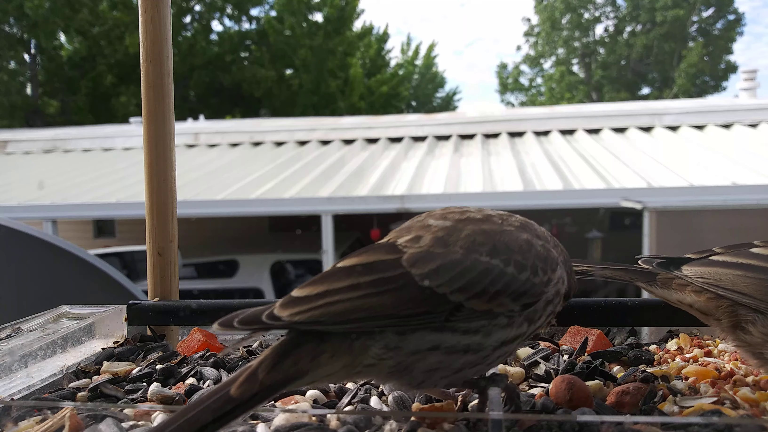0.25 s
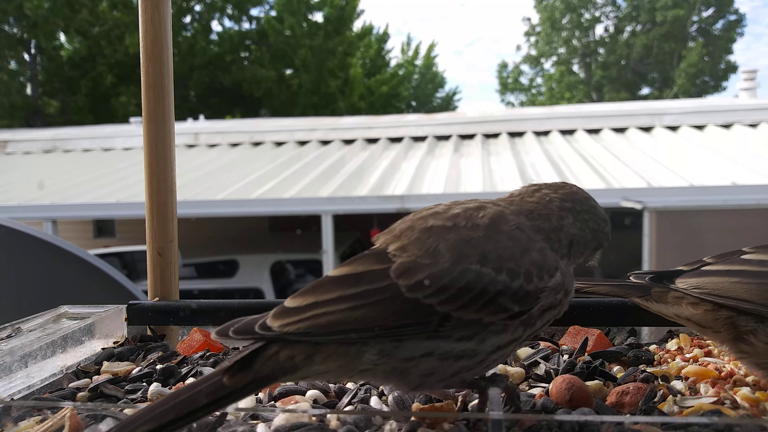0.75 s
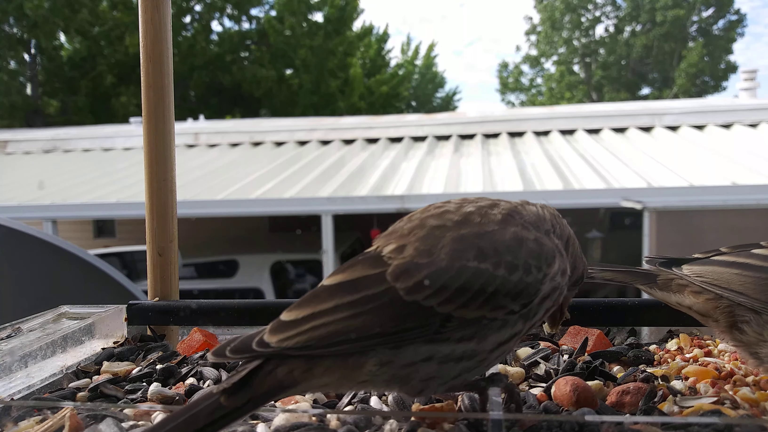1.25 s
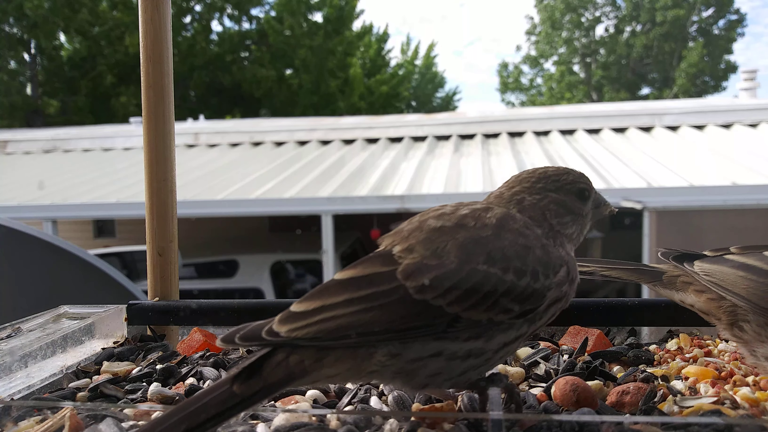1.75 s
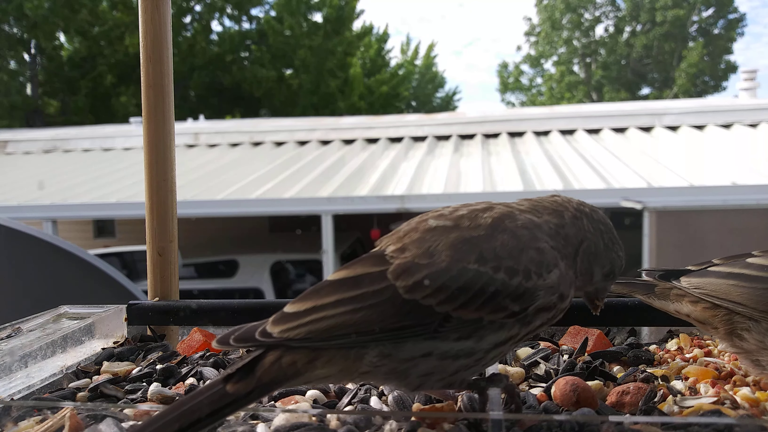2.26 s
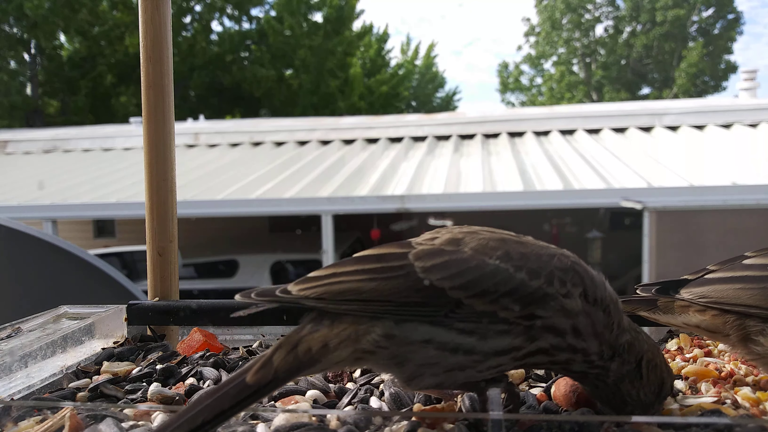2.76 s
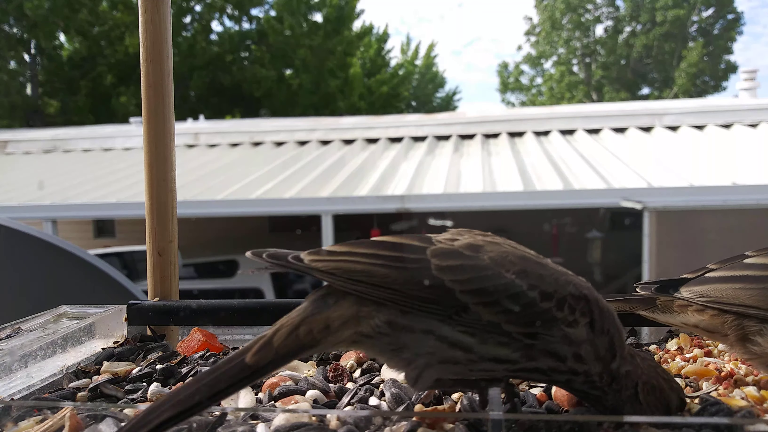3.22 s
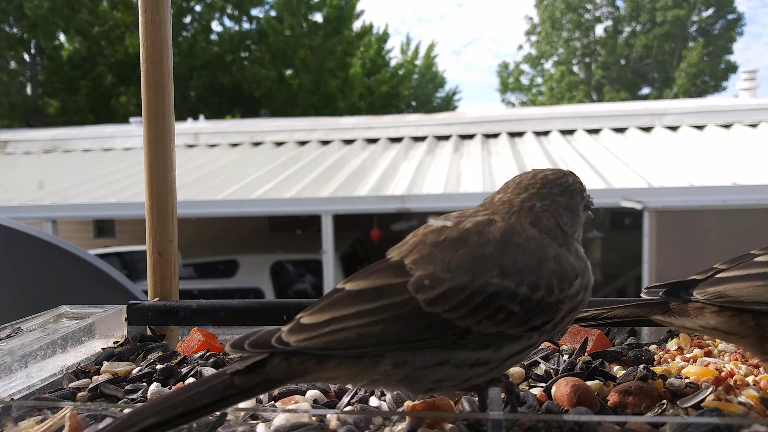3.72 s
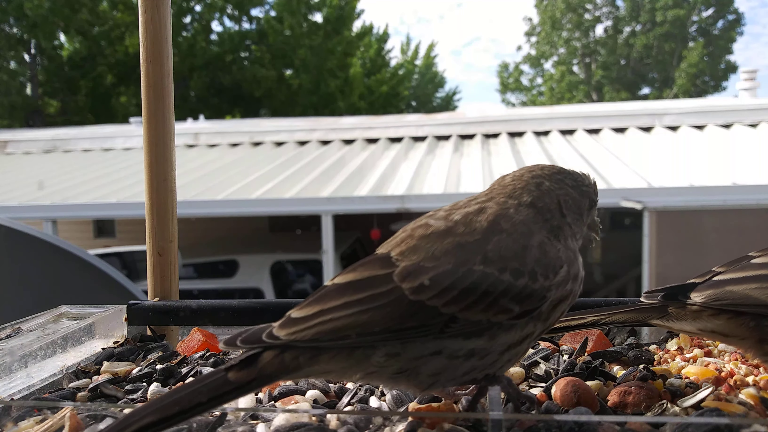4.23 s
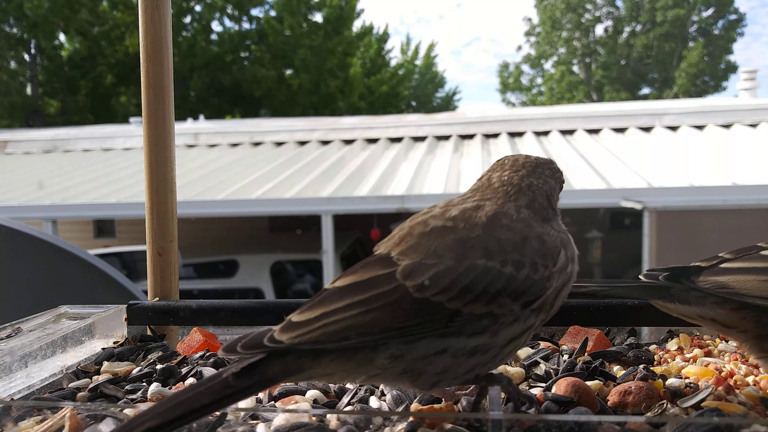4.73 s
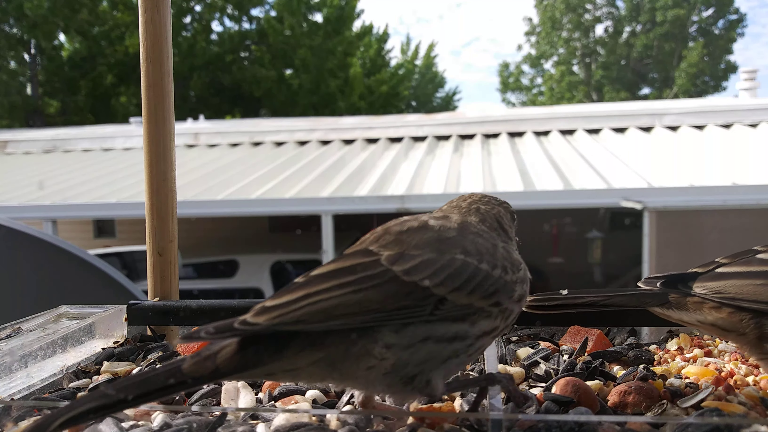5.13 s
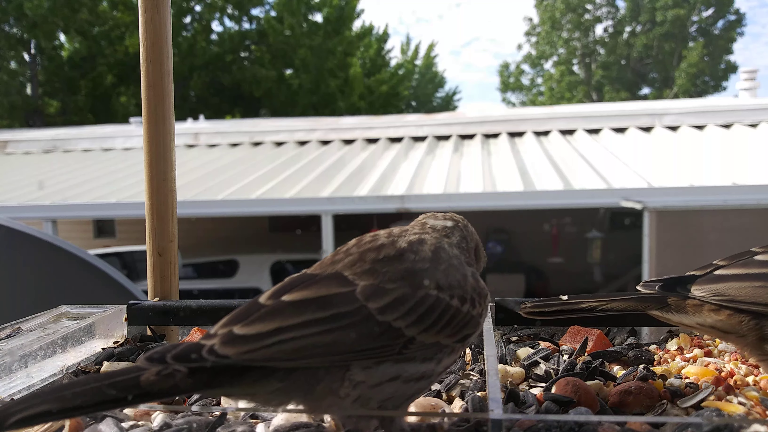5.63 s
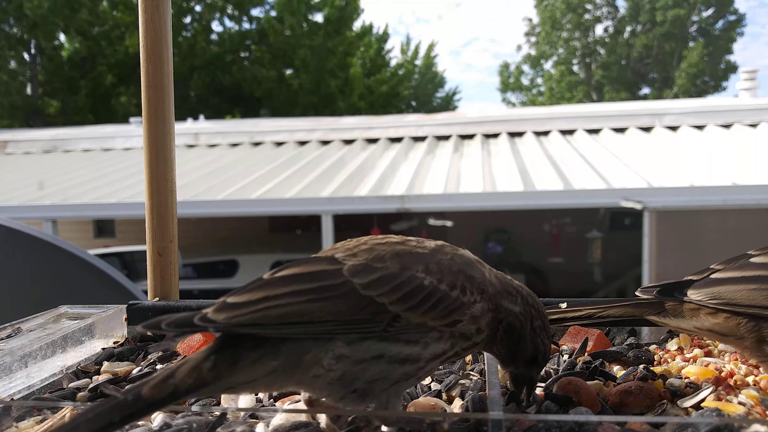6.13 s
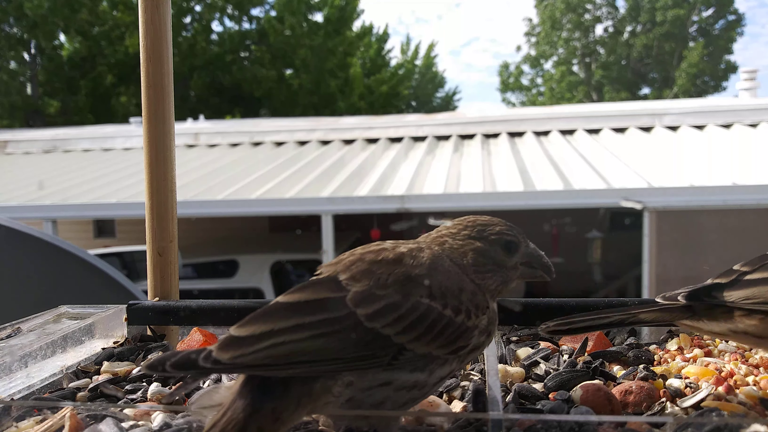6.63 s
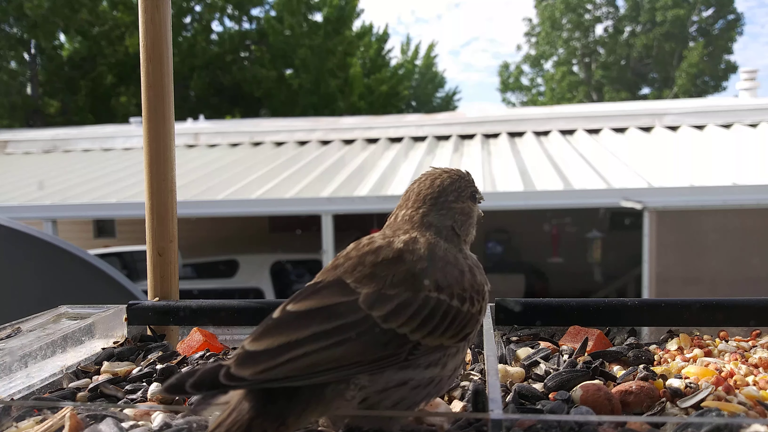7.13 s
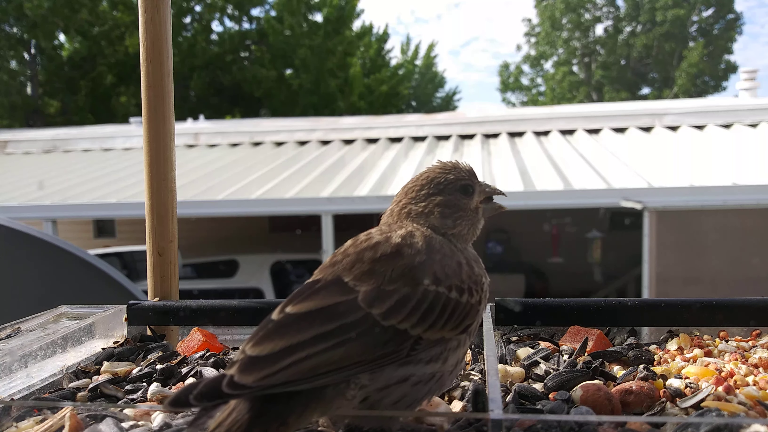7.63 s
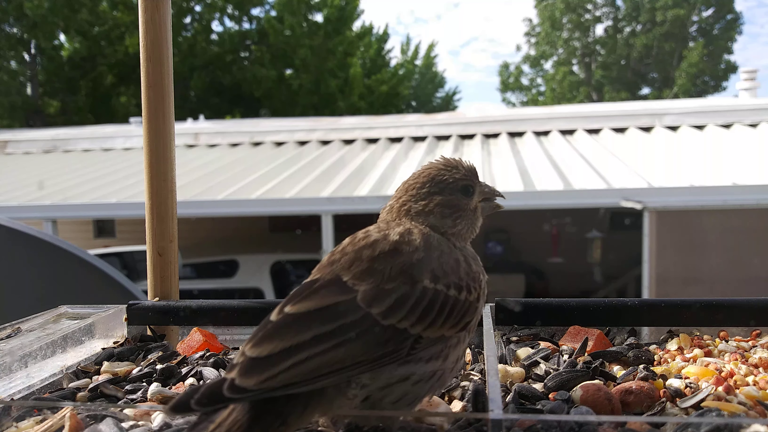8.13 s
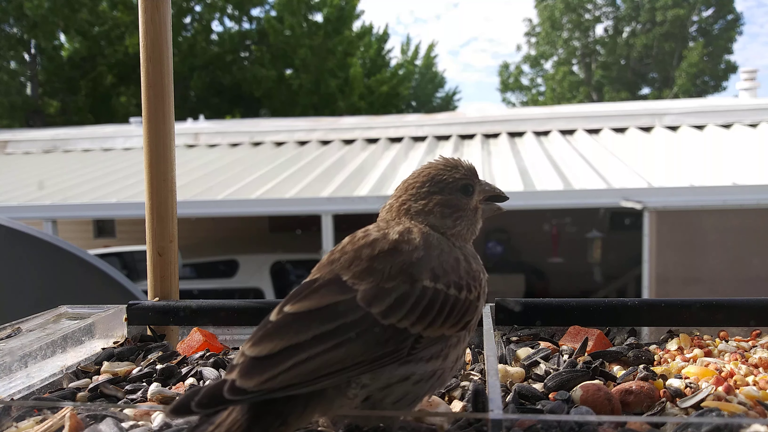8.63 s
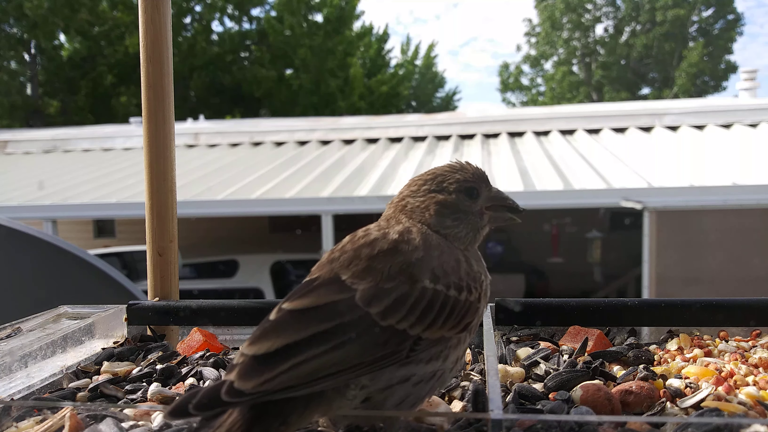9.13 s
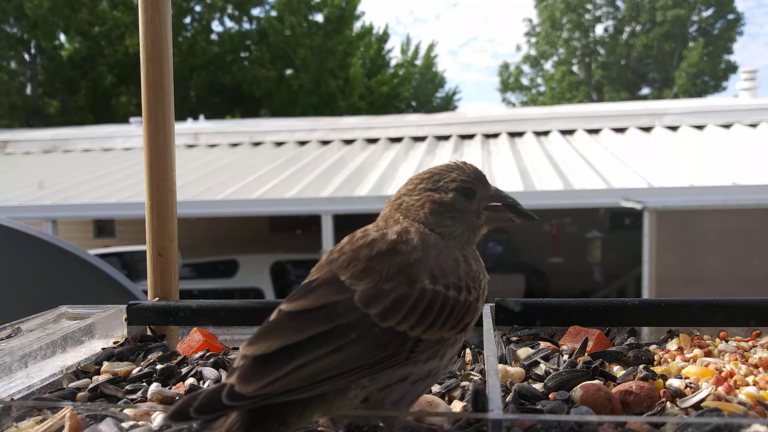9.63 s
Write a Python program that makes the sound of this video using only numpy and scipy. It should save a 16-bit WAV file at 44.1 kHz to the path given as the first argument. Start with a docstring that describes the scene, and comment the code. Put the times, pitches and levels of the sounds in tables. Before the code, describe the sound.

Dry, crisp beak clicks and brief raking of loose seed on a small hollow plastic tray, recorded centimetres away in an open yard. Activity is irregular: light at first, dense around three seconds, loudest just before seven, then delicate ticking. Breeze hums and low puffs of air bump the microphone, strongest late, over soft hush, distant whistles and blurred twittering.

```python
"""Beaks crack husks and rake seed, and dropped seeds knock on a plastic tray, centimetres from the microphone.
Two finches feed there: noise bursts drive tray modes and husk resonances; finer grains make the nibbling.
A breeze hums around the feeder (narrow noise and wavering tones) and puffs thump the microphone (low noise).
Other birds call far off in the yard (gliding sines, blurred chirps) over a steady hush (coloured noise)."""
import sys
import numpy as np
from scipy import signal
from scipy.fft import rfft, irfft, next_fast_len
from scipy.io import wavfile
from scipy.ndimage import uniform_filter1d, map_coordinates

SR = 44100
rng = np.random.default_rng(int(sys.argv[2]) if len(sys.argv) > 2 else 0)


def waveform_to_disk(signal):
    """Save audio, clipped to [-1, 1], as 16-bit WAV at the path in sys.argv[1]."""
    frames = np.transpose(np.atleast_2d(signal))
    scaled = np.clip(frames, -1, 1) * 32767
    samples = np.round(scaled).astype(np.int16)
    wavfile.write(sys.argv[1], SR, samples)


N = 435266
BAND_LIMIT_HZ = 15900


def amp(db):
    """Decibels to gain."""
    return 10 ** (np.asarray(db) / 20)


def unit(x):
    """Scales to rms 1."""
    return x / np.sqrt(np.mean(x ** 2) + 1e-20)


def spectrum_at(points, hz):
    """Reads (frequency [Hz], value) points on a log-frequency axis."""
    point_hz, value = np.transpose(points)
    return np.interp(np.log(hz + 1), np.log(point_hz), value)


def follow(rows):
    """Interpolates the columns of a curve table at every sample."""
    time_s, *columns = np.transpose(rows)
    return [np.interp(np.arange(N) / SR, time_s, column) for column in columns]


def add(mix, time_s, sound):
    """Mixes a sound in at a given time, cut at the end of the mix."""
    part = mix[max(round(time_s * SR), 0):][:len(sound)]
    part += sound[:len(part)]


def colour(x, points):
    """Shapes a long sound by (frequency [Hz], gain [dB]) points, at rms 1."""
    size = next_fast_len(N)
    gain = amp(spectrum_at(points, np.fft.rfftfreq(size, 1 / SR)))
    return unit(irfft(rfft(x, size) * gain, size)[:N])


def drift(knots_per_s):
    """Smooth random wandering, rms 1."""
    knots = rng.standard_normal(4000)
    return unit(map_coordinates(knots, [np.arange(N) / SR * knots_per_s], order=3, mode="wrap"))


def resonate(x, hz, q):
    """A resonance of peak gain 1; Q is at least 1."""
    return signal.lfilter(*signal.iirpeak(np.clip(hz, 100, SR / 3), max(q, 1), fs=SR), x)


def high_pass(x, hz):
    """Cuts steeply below hz."""
    return signal.sosfilt(signal.butter(4, hz, "highpass", fs=SR, output="sos"), x)


def narrow_noise(centre_hz, width_hz):
    """Slow complex noise shifted up to a pitch or pitch curve, rms 1."""
    turn = np.exp(2j * np.pi * np.cumsum(centre_hz * np.ones(N)) / SR)
    return unit(((drift(width_hz) + 1j * drift(width_hz)) * turn).real)


def mottle(x, depth_db, size=(9, 2)):
    """Patches of a few tens of milliseconds by about a hundred hertz swell and fade; rms 1."""
    z = signal.stft(x, nperseg=1024, noverlap=768)[2]
    patches = rng.standard_normal(z.shape)
    patches = uniform_filter1d(patches, size[0], axis=1)  # time
    patches = uniform_filter1d(patches, size[1], axis=0)  # frequency
    return unit(signal.istft(z * amp(depth_db * unit(patches)), nperseg=1024, noverlap=768)[1][:N])


def spells(rows, attack_s, release_db_per_s):
    """Gain of a layer in spells: each rises, holds for its length and dies away; the strongest wins."""
    t = np.arange(N) / SR
    gains = []
    for time_s, length_s, db in rows:
        rise = np.clip((t - time_s) / attack_s + .5, 0, 1)
        gains.append(rise * amp(db - release_db_per_s * np.maximum(t - time_s - length_s, 0)))
    return np.max(gains, axis=0)


def whistle(length_s, start_hz, end_hz, waver, flutter, wobbles_per_s):
    """One gliding sine that wavers in pitch and strength, at least 10 ms long, rms 1."""
    t = np.arange(0, max(length_s, .01), 1 / SR)
    bend, swell = [np.interp(t * wobbles_per_s, np.arange(256), row)
                   for row in rng.standard_normal((2, 256))]
    hz = np.linspace(start_hz, end_hz, len(t)) * (1 + waver * bend)
    tone = np.sin(2 * np.pi * np.cumsum(hz) / SR)
    return unit(tone * (1 + flutter * swell) * signal.windows.tukey(len(t), .7))


# tray modes: (frequency [Hz], level relative to the blow [dB], t60 [s])
TRAY_MODES = [(735, -41, 0.1), (826, -42.5, 0.1), (1117, -30.5, 0.034), (1405, -36, 0.082),
              (1794, -38.5, 0.086), (2152, -36.5, 0.054), (2890, -26, .02), (3890, -5, 0.0022),
              (4010, -32, 0.0205), (5040, -24, 0.0114), (5700, -9.5, 0.0047), (6350, -20.5, 0.01),
              (7900, -23.5, 0.0036), (9000, -14.5, 0.0018), (11900, -49.5, 0.005), (14500, -27.5, 0.0024)]
# knock, crack and tick ranges: (low edge [Hz], high edge [Hz])
RANGES_HZ = [(520, 2000), (2000, 7000), (7000, 16500)]


def tray_responses():
    """A blow and the modes it rings, split into knock, crack and tick ranges."""
    t = np.arange(4096) / SR
    ring = sum(amp(db - 60 * t / t60_s) * np.cos(2 * np.pi * hz * t) for hz, db, t60_s in TRAY_MODES)
    ring[0] += 1  # the blow itself
    return [signal.sosfilt(signal.butter(3, edges_hz, "bandpass", fs=SR, output="sos"), ring)
            for edges_hz in RANGES_HZ]


def strike(force, levels_db, knock_hz, level_window_s, responses, knock_q, top_hz, leak=0.14):
    """Passes a force through the tray, whose knock depends on the spot; sets each range's level."""
    knock, crack, tick = [signal.fftconvolve(force, response) for response in responses]
    hollow = resonate(resonate(knock, knock_hz, knock_q), knock_hz, knock_q)  # twice: rounder
    knock = hollow + leak * knock
    tick = signal.lfilter(*signal.butter(4, min(top_hz, BAND_LIMIT_HZ), fs=SR), tick)
    # each range's energy equals its rms level held over the window
    return sum(amp(db) * part * np.sqrt(level_window_s * SR / np.sum(part ** 2))
               for db, part in zip(levels_db, (knock, crack, tick)))


def break_husk(responses, levels_db, decay_ms, knock_hz, knock_q, rings_hz, ring_q, ring_db):
    """A snap, then decaying splinter noise over a weak rattle, all exciting the husk's resonances."""
    snap, rise_s, rattle_db, rattle_s = 1.4, 0.00075, -28, 0.0027
    t = np.arange(1500) / SR
    envelope = np.exp(-t / (decay_ms * 10 ** -3)) + amp(rattle_db) * np.exp(-t / rattle_s)
    force = rng.standard_normal(len(t)) * envelope * (1 - np.exp(-t / rise_s))
    force[8] += snap
    force = force + amp(ring_db) * sum(resonate(force, hz, ring_q) for hz in rings_hz)
    top_hz = 11000 + 0.42 * max(rings_hz)  # a stiffer husk breaks more brightly
    return strike(force, levels_db, knock_hz, .01, responses, knock_q, top_hz)


# beak blows and dropped seeds: (time [s], knock level [dB], crack level [dB], tick level [dB],
# decay constant [ms], knock pitch [Hz], knock Q, husk pitch [Hz])
TRAY_PECKS = [(1.126, -47, -46, -49.5, 3.1, 1110, 3, 4260), (2.7129, -39.5, -47, -55, 3.5, 1332, 4.8, 3200),
              (2.8114, -45, -45, -49, 2.4, 1520, 2, 2470), (2.815, -47.5, -59, -52, 5.9, 810, 5, 4000),
              (2.8267, -58, -41.5, -46, 9.7, 1900, 1.4, 4620),
              (2.886, -40.5, -41, -39, 2.9, 1380, 2.8, 7000),
              (2.9518, -61, -46, -41.5, 2.6, 1380, 2.5, 8650),
              (3.0189, -41, -44, -44, 6.2, 1310, 2.2, 2500),
              (3.0893, -59, -42.5, -39.5, 0.97, 1380, 2.4, 9700),
              (3.1917, -35, -44.5, -43, 2.3, 1400, 3, 8550),
              (3.1968, -37.5, -51.5, -50, 1.4, 870, 1.3, 8900),
              (3.236, -44, -63, -48, 0.62, 1130, 2.8, 9600), (3.2674, -43, -60, -46, 3.7, 1490, 2.2, 8900),
              (3.282, -43.5, -47.5, -45, 8.3, 1400, 1.4, 2580),
              (3.328, -48.5, -63, -47.5, 0.31, 1100, 1.3, 11500),
              (3.4976, -41, -32.5, -28.5, 0.64, 1109, 1.3, 6000),
              (3.5004, -30.5, -28.5, -29, 1.7, 1450, 1.3, 8400), (3.529, -50, -50, -39, 1, 1270, 2, 10500),
              (3.5462, -48, -41, -41, 0.49, 1220, 2, 6000), (3.555, -46, -47, -64, 1.1, 1430, 1.9, 5600),
              (3.7576, -50, -44, -49.5, 3.4, 1300, 3.8, 4400),
              (4.887, -51.5, -56.5, -66, 4.2, 1320, 4.6, 3200),
              (4.994, -52, -57, -80, 7.9, 1387, 4.4, 2590), (5.008, -56, -55, -75, 6.8, 1800, 3.2, 3800),
              (5.028, -52.5, -46, -53, 17, 1350, 2.7, 5100),
              (5.2647, -46.5, -49, -54.5, 5.8, 1270, 5, 3600), (5.282, -52, -53, -63, 14, 1290, 5.7, 3600),
              (5.3105, -45.5, -41, -44, 5.6, 1170, 2.4, 5840),
              (5.3307, -56, -46, -41.5, 1.1, 1480, 0.9, 5870),
              (5.8976, -39, -60, -85, 0.75, 1103, 2.5, 3200), (6.4, -47, -48.5, -51, 3.7, 1240, 3, 8500),
              (6.455, -39.5, -44.5, -51.5, 2.1, 1440, 5, 4830),
              (6.5154, -55, -47.5, -58.5, 0.59, 1130, 3.1, 3400),
              (6.8517, -35, -42, -42, 2.3, 1260, 1.1, 4500),
              (6.8582, -39, -29, -32.5, 1.3, 1220, 1.6, 9000),
              (6.8604, -26.5, -26, -36, 1.37, 993, 1.8, 4850),
              (6.876, -40, -54, -41, 0.43, 1510, 1.2, 9600), (6.897, -56, -61, -57, .4, 1300, 1.5, 10500),
              (6.9051, -36.5, -33.5, -35.5, 0.97, 1840, 2.1, 6400),
              (6.9252, -47, -54, -51, 0.4, 1300, 1.5, 6400),
              (6.9285, -43.5, -40, -40.5, 1.1, 1300, 0.79, 6400),
              (7.345, -49.5, -31, -43, 3, 1503, 1.4, 6300), (7.353, -45, -46, -56, 3, 1720, 1.5, 3900)]
# hard seeds splitting: (time [s], knock level [dB], crack level [dB], tick level [dB],
# decay constant [ms], knock pitch [Hz], knock Q, three ring pitches [Hz])
SEED_SPLITS = [(3.8671, -35, -28.5, -29.5, 2.2, 2700, 1.6, 2700, 4070, 9750),
               (6.6039, -41.5, -28, -32.5, 0.66, 1158, 1.5, 3540, 5800, 8850),
               (6.817, -25.5, -18, -15.5, 1.74, 1040, 1.35, 5270, 8300, 11900),
               (6.8631, -29, -26, -25, 1.26, 1660, 1.3, 4200, 9200, 13300),
               (7.3403, -41, -23.5, -24.5, 2.3, 1886, 1.8, 3900, 6200, 11900)]
# husks split in the beak: (time [s], crack level [dB], tick level [dB], decay constant [ms], husk pitch [Hz])
BEAK_SNAPS = [(0.071, -42.5, -45.5, 10, 4600), (1.569, -47.5, -57, 7.7, 4450), (1.808, -72, -46, 6.1, 9600),
              (1.869, -64, -46, 0.77, 11600), (1.9734, -51, -49, 1.94, 10000),
              (2.1354, -49, -55, 0.79, 3750), (2.485, -52, -57, 3, 4800),
              (3.4203, -44.5, -37.5, 0.39, 11600), (3.425, -53, -42, .65, 11650),
              (3.57, -58, -43, 0.19, 11000), (2.862, -51, -51, 1.2, 10000), (3.352, -54, -48, 4, 9000),
              (3.587, -62, -48, 0.71, 11500), (3.741, -52, -50, 4, 9500), (3.81, -48, -50, 1.5, 4200),
              (3.828, -57, -52.5, 1.02, 11500), (4.032, -56, -58, 1.1, 11000),
              (4.085, -56, -56.5, 2.6, 8500), (3.378, -54, -58, 2.5, 5000), (3.8686, -37, -51, 1.2, 9500),
              (3.873, -37.5, -58, 9, 2640), (3.992, -49.5, -57, 1.6, 3360),
              (4.439, -49.5, -57.5, 0.51, 4320), (4.5033, -51.5, -45.5, 0.45, 11700),
              (4.579, -58, -48, .6, 11600), (6.473, -47, -52, 2.4, 5200), (6.534, -46.5, -52, 5, 3837),
              (6.6573, -47, -49, 4.8, 4270), (6.736, -49.5, -57, 0.82, 5900),
              (6.786, -68, -48, 0.79, 11000), (6.791, -50, -41.5, 8.7, 11000),
              (7.061, -54, -60.5, 3.5, 5000), (7.248, -66, -63.5, 1.9, 8850),
              (7.317, -70, -56.5, 1.49, 13200), (7.715, -54, -57.5, 2.2, 4750),
              (7.791, -53.5, -54.5, 4.1, 5800), (7.874, -53, -63, 3.8, 5570),
              (8.077, -64.5, -66.5, 4.7, 8900), (8.186, -60.5, -55.5, 0.74, 13900),
              (8.532, -58.5, -66.5, 2, 4970), (9.364, -64, -61, 2.1, 10040),
              (9.618, -67, -66.5, 1.82, 9940), (9.759, -58, -69, 2.15, 5030),
              (9.074, -55, -53.5, 0.59, 12900), (9.115, -67, -62, .8, 14200),
              (9.146, -48.5, -56, 1.5, 3320), (9.3793, -51, -44.5, 2.1, 12500),
              (9.687, -57.5, -74, 3.7, 5040), (9.713, -57.5, -64, 5, 5000),
              (9.7834, -52, -54.5, 1.17, 5500)]


def clicks(responses, husk_q=5, husk_db=4, split_q=14, split_db=7, beak_edge_hz=2500):
    """Husks break on the tray; hard seeds ring longer; in the beak there is no low body."""
    on_tray, in_beak = np.zeros((2, N))
    for time_s, *levels_db, decay_ms, knock_hz, knock_q, husk_hz in TRAY_PECKS:
        add(on_tray, time_s, break_husk(responses, levels_db, decay_ms, knock_hz, knock_q,
                                        [husk_hz], husk_q, husk_db))
    for time_s, knock_db, crack_db, tick_db, decay_ms, knock_hz, knock_q, *rings_hz in SEED_SPLITS:
        add(on_tray, time_s, break_husk(responses, (knock_db, crack_db, tick_db), decay_ms, knock_hz,
                                        knock_q, rings_hz, split_q, split_db))
    for time_s, crack_db, tick_db, decay_ms, husk_hz in BEAK_SNAPS:
        levels_db = (-np.inf, crack_db, tick_db)  # no knock
        add(in_beak, time_s, break_husk(responses, levels_db, decay_ms, beak_edge_hz, 1,
                                        [husk_hz], husk_q, husk_db))
    return on_tray + high_pass(in_beak, beak_edge_hz)


# beak and feet raking, seeds settling: (time [s], length [s], relative tray level [dB],
# relative husk level [dB], relative tick level [dB], knock pitch [Hz])
RAKE_STROKES = [(0.05, 0.013, -45, -64, -56, 620), (0.259, 0.07, -62, -53.5, -55, 736),
                (1.11, 0.13, -59.5, -56, -60.5, 1030), (1.563, 0.051, -57, -53, -43.5, 1400),
                (1.614, 0.44, -74, -64.5, -57.5, 1410), (1.726, 0.017, -65, -53, -43, 1410),
                (2.706, 0.03, -44.5, -41.5, -42.5, 1390), (2.723, 0.91, -66, -66, -73, 1500),
                (2.81, 0.018, -41, -50, -62, 1700), (2.87, 0.017, -37, -44, -45, 1470),
                (2.851, 0.49, -62, -57, -70, 1800), (2.929, 0.037, -44, -46, -48, 1430),
                (3.043, 0.042, -49, -54, -57, 1280), (3, 0.029, -39.5, -54.5, -46.5, 1310),
                (3.177, 0.026, -47.5, -50, -43, 940), (3.205, 0.041, -47.5, -59.5, -69, 1070),
                (3.268, 0.054, -45, -48, -49, 1470), (3.326, 0.087, -54.5, -49, -46, 1310),
                (3.514, 0.17, -54, -52.5, -63, 1400), (3.861, 0.16, -70.5, -54, -68, 1950),
                (4.999, 0.16, -68, -53, -56.5, 1380), (5.273, 0.2, -70, -51, -55.5, 1807),
                (5.306, 0.064, -52.5, -53, -64, 1950), (5.31, 0.031, -47, -62, -70, 1080),
                (5.892, 0.019, -37, -87.5, -101, 570), (5.909, 0.059, -48, -55, -65, 1250),
                (6.248, 0.096, -62, -47.5, -47.5, 1797), (6.326, 0.026, -51.5, -48, -50, 1474),
                (6.396, 0.012, -47, -69, -68, 1320), (6.441, 0.023, -42.5, -57, -48, 1300),
                (6.47, 0.042, -55.5, -57, -74, 1360), (6.62, .045, -53, -54.5, -63, 1230),
                (6.742, 0.044, -57, -67, -56, 1310), (6.765, 0.035, -53, -69.5, -72, 850),
                (6.818, 0.12, -40.5, -48, -57, 930), (6.844, 0.026, -48, -47, -58, 900),
                (7.342, 0.07, -54, -48, -55, 1630), (9.085, 0.082, -76, -63, -68, 1410),
                (9.152, 0.073, -69, -59, -64, 1410), (9.379, 0.095, -79, -60, -60.5, 1400),
                (9.759, 0.12, -84, -64, -68, 1382)]


def scrapes(responses, grains_per_s=1000, spread_db=4.0, rub=0.32, knock_q=3.55, leak=0.11, top_hz=14000,
            rise_share=0.18, hold_share=0.61, settle_s=0.021, jerk_db=2.5, jerks_per_s=170, level_db=-4.5):
    """Each stroke shoves a clump of seeds that give way in jerks, tick on each other and the tray, settle."""
    out, t = np.zeros(N), np.arange(SR) / SR
    for time_s, length_s, *levels_db, knock_hz in RAKE_STROKES:
        chance, size, push = rng.random(SR), rng.exponential(1, SR), rng.standard_normal(SR)
        grains = (chance < grains_per_s / SR) * amp(spread_db * np.minimum(size, 3))
        rise = np.minimum(t / (rise_share * length_s), 1)
        settle = np.exp(-np.maximum(t - hold_share * length_s, 0) / settle_s)
        jerks = amp(jerk_db * np.interp(t * jerks_per_s, np.arange(256), rng.standard_normal(256)))
        force = push * (rub + grains) * rise * settle * jerks
        n = int((length_s + .1) * SR)
        add(out, time_s, strike(force[:n], levels_db, knock_hz, length_s, responses, knock_q, top_hz, leak=leak))
    return amp(level_db) * out


# mumbling a husk in the beak: (time [s], length [s], level [dB])
NIBBLE_SPELLS = [(1.6, 0.26, -61.5), (1.85, 0.42, -64), (2.42, 0.095, -61), (2.78, 0.44, -60),
                 (3.37, 0.049, -55), (3.64, 0.16, -56), (3.96, 0.21, -58), (4.41, 0.07, -65),
                 (4.5, 0.086, -61.5), (6.3, 0.39, -58), (6.75, 0.22, -55.5), (7.6, 0.22, -64)]


def nibbling(responses, grains_per_s=900, spread_db=7.0, rub=0.084, attack_s=0.068, release_db_per_s=90,
             bites_per_s=60, bite_s=0.0037, bite_db=-8, clumps_per_s=35, clump_db=3.5):
    """Fine crackle of husk and claw: small decaying bites, and fragments ringing at one of 12 pitches."""
    grains = (rng.random(N) < grains_per_s / SR) * amp(spread_db * np.minimum(rng.exponential(1, N), 3))
    fragment = rng.integers(0, 12, N)
    bites = (rng.random(N) < bites_per_s / SR) * (.5 + rng.random(N))
    crunch = amp(bite_db) * signal.lfilter([1], [1, -np.exp(-1 / (bite_s * SR))], bites)
    force = (rub + crunch) * rng.standard_normal(N) + 0.18 * grains
    for k, hz in enumerate(np.geomspace(3500, 13500, 12)):
        force += 0.67 * resonate(grains * (fragment == k), hz, 6.2)
    clumped = force * amp(clump_db * drift(clumps_per_s))
    crackle = signal.oaconvolve(clumped, sum(responses))[:N]
    crackle = colour(crackle, [(700, -12.0), (1500, -8.5), (2200, -4.5), (3000, 6.5), (6000, -0.5),
                               (9000, 3.5), (12500, 7.0), (14500, -5.0), (16000, -5.0)])
    return crackle * spells(NIBBLE_SPELLS, attack_s, release_db_per_s)


# wind strength, also driving hums and buffeting: (time [s], relative level [dB], eddy pitch [Hz])
WIND = [(0, -91, 260.7), (1.1, -62.5, 163.2), (1.5, -87, 190), (1.66, -56, 189), (1.85, -94, 198),
        (2.1, -51.5, 177.7), (2.3, -77, 180), (2.5, -53, 181.5), (2.76, -77, 180.3), (2.87, -47, 191.4),
        (3.33, -55.5, 215), (3.5, -45, 245), (3.66, -52, 229.6), (3.8, -44, 283.6), (3.9, -48.5, 243.2),
        (4.1, -48.5, 190), (4.25, -68.5, 221), (4.45, -44, 220), (4.65, -84, 210), (5.02, -48.5, 180),
        (5.7, -82.5, 179.7), (6.36, -56, 203.5), (6.52, -41, 223.3), (6.88, -56, 190), (7.35, -39.5, 190),
        (7.65, -44.5, 202.3), (7.79, -45, 250), (7.95, -46.5, 221.5), (8.04, -52, 242),
        (8.09, -50.5, 272.6), (8.17, -36.5, 376.4), (8.21, -44, 370), (8.28, -35.5, 356.6),
        (8.37, -44.5, 363.8), (8.5, -35.5, 339.5), (8.7, -37, 318.2), (8.83, -45.5, 316),
        (8.96, -39.5, 334), (9.06, -36, 345), (9.16, -46.5, 350), (9.23, -42.5, 331), (9.34, -48, 260),
        (9.55, -52.5, 235), (9.87, -47, 190)]


def breeze(width_hz=150, knee_db=-52, squeeze=0.052, low_edge_hz=75, level_db=-6.5):
    """Loose eddies whose pitch follows the wind; in stronger air they give energy to the hums."""
    gust_db, eddy_hz = follow(WIND)
    loose_db = gust_db - squeeze * np.maximum(gust_db - knee_db, 0)
    eddies = narrow_noise(eddy_hz, width_hz) + 0.5 * narrow_noise(eddy_hz, 2 * width_hz)
    return amp(loose_db + level_db) * high_pass(eddies, low_edge_hz)


# tones of the feeder and its hanger: (time [s], length [s], pitch [Hz], level relative to the WIND table [dB])
WIND_TONES = [(2.8, 1.9, 179.2, -3.5), (3.295, 0.78, 259.5, 2.5), (3.723, 0.16, 391, -13.5),
              (6.415, 0.21, 231.8, -6), (6.673, 0.074, 392, -8.5), (6.9, 1.366, 156.4, -8),
              (7.199, 1.13, 237.7, -8.5), (7.5, 1.39, 382, -2), (8.795, 0.67, 383.7, -8.5),
              (8.104, 1.8, 324.1, -8.5), (8.48, 0.36, 242, -10), (8.482, 1.32, 299.3, -9.5),
              (9.25, 0.62, 165, -3.5)]


def hums(waver=0.02, flutter=0.64, wobbles_per_s=44.35):
    """Eddies lock onto resonances; each wavering tone swells and sinks with the breeze."""
    out = np.zeros(N)
    for time_s, length_s, hz, db in WIND_TONES:
        add(out, time_s, amp(db) * whistle(length_s, hz, hz, waver, flutter, wobbles_per_s))
    return amp(follow(WIND)[0]) * out


# air thumping the microphone: (time [s], length [s], relative level [dB])
AIR_PUFFS = [(3.284, 0.04, -57), (3.45, 0.071, -60), (3.88, 0.024, -69), (4.384, 0.075, -57.5),
             (4.729, 0.048, -60.5), (4.926, 0.25, -54.5), (5.28, 0.19, -55.5), (5.59, 0.041, -58),
             (5.801, 0.16, -60), (6.058, 0.22, -65), (6.287, 0.072, -65), (6.423, 0.027, -49),
             (6.663, 0.9, -56), (7.864, 0.062, -69), (8.22, 0.39, -60.5), (8.829, 0.029, -60.5),
             (9.218, 0.065, -50), (9.3, 0.55, -56)]
# turbulence spectrum: (frequency [Hz], relative level [dB])
BUFFET_SPECTRUM = [(20, -46), (35, -32.5), (50, -14), (80, 0.5), (130, -2), (190, 0.5), (300, -29),
                   (600, -53)]


def buffeting(attack_s=0.016, release_db_per_s=200, puff_db=2, steady_db=-24, calm_db=-79):
    """Low turbulence at the microphone: a constant trace, a little that follows the breeze, and puffs."""
    steady = amp(calm_db) + amp(follow(WIND)[0] + steady_db)
    puffs = amp(puff_db) * spells(AIR_PUFFS, attack_s, release_db_per_s)
    return (steady + puffs) * colour(rng.standard_normal(N), BUFFET_SPECTRUM)


# echo decay: (frequency [Hz], t60 [s])
YARD_DECAY = [(500, 0.24), (1500, 0.48), (4000, 0.31), (7000, 0.33), (11000, 0.19), (16000, 0.68)]


def yard(x):
    """Scattered echoes from walls and trees: sparse random taps, each frequency with its own decay."""
    taps = rng.standard_normal(SR) * (rng.random(SR) < .15)
    taps[:300] = 0  # gap before the first echo
    hz, t, z = signal.stft(taps, SR, nperseg=256)
    decay = amp(-60 * t / spectrum_at(YARD_DECAY, hz)[:, None])
    tail = signal.istft(z * decay, SR, nperseg=256)[1]
    return signal.oaconvolve(x, tail / np.linalg.norm(tail))[:N]


# whistles, slurs and chips: (time [s], length [s], start pitch [Hz], end pitch [Hz],
# relative level [dB], roughness [0-1, clipped])
BIRD_CALLS = [(0.114, 0.1, 1790, 1800, -63, 0.7), (0.328, 0.24, 1337, 1266, -60, 0.72),
              (0.413, 0.073, 764, 727, -51.5, 0.61), (0.607, 0.058, 1850, 1885, -65, .8),
              (0.811, 0.028, 760, 780, -55, 0.7), (0.85, 0.051, 1570, 1850, -64, 1),
              (0.892, 0.095, 820, 780, -55.5, 0.63), (1.281, 0.043, 4300, 5020, -54.5, 0.74),
              (1.169, 0.27, 1384, 1375, -61.5, 0.37), (1.326, 0.36, 1401, 1411, -47, 0.14),
              (1.552, 0.22, 1830, 1753, -63.5, 0.68), (2.148, 0.18, 1368, 1409, -55, 0.28),
              (2.164, .11, 3860, 3210, -52, 0.9), (2.696, 0.2, 1401, 1393, -48.5, 0.42),
              (3.613, 0.033, 820, 740, -54.5, 0.77), (3.642, 0.023, 510, 426, -51.5, 0.6),
              (3.795, 0.048, 425, 840, -62, 0.63), (4.304, 0.12, 1381, 1413, -54.5, 0.4),
              (5.329, 0.18, 2790, 2740, -64, 0.14), (5.373, 0.066, 4450, 4220, -58.5, .7),
              (6.665, 0.027, 2870, 2820, -57, 0.3), (7.024, 0.077, 3350, 2670, -61, 0.72),
              (7.204, 0.12, 3690, 2533, -61.5, 0.6), (7.477, 0.07, 4000, 2600, -55.5, 0.51),
              (7.918, .12, 3786, 3400, -56.5, 0.1), (8.006, 0.085, 3580, 2739, -64.5, 0.4),
              (8.278, 0.027, 4400, 3850, -63, .8), (8.368, 0.1, 3630, 2746, -62.5, 0.7),
              (8.405, 0.15, 5480, 4830, -61.5, 1.1), (8.549, .1, 4816, 4540, -68.5, 1.2),
              (8.661, 0.17, 1480, 1511, -60, 0.85), (8.795, 0.11, 1014, 1016, -56.5, .7),
              (8.83, 0.071, 3230, 2690, -65.5, 1), (8.972, 0.062, 799, 768.2, -57.5, 0.54),
              (9.148, 0.053, 4320, 3530, -59, 1.1), (9.507, 0.056, 2252, 2290, -54, 0.24)]


def far_birds(level_db=-4, echo_db=-3, blur_share=.11):
    """Single gliding calls; the rougher ones break up into a band of noise around their pitch."""
    out = np.zeros(N)
    for time_s, length_s, start_hz, end_hz, db, rough in BIRD_CALLS:
        rough = np.clip(rough, 0, 1)
        tone = whistle(length_s, start_hz, end_hz, .004, .3, 90)
        knots = rng.standard_normal((256, 2)) @ [1, 1j]
        knots_per_s = blur_share * start_hz * (.5 + rough)
        scatter = np.interp(np.arange(len(tone)) / SR * knots_per_s, np.arange(256), knots)
        blurred = unit((signal.hilbert(tone) * scatter).real)
        add(out, time_s, amp(db) * unit((1 - rough) * tone + rough * blurred))
    return amp(level_db) * (out + amp(echo_db) * yard(out))


# far chatter: (time [s], level [dB])
CHATTER_LEVEL = [(0, -55.5), (.55, -63), (1.01, -59), (2.6, -58.5), (2.9, -55), (3.9, -55.5), (4.8, -65.5),
                 (5.8, -59.5), (6.46, -58), (7.15, -65), (7.9, -62.5), (8.14, -67), (8.5, -66.5),
                 (8.95, -70.5), (9.87, -69.5)]
# chorus spectrum: (frequency [Hz], relative level [dB])
CHATTER_SPECTRUM = [(400, -20.5), (800, -26), (1500, 3.5), (2000, -10), (2350, -8), (3000, 7.5),
                    (3500, 7.5), (3900, 2), (4400, 11), (5500, 2.5), (6700, -5.5), (8500, -20),
                    (12000, -51)]


def chatter(count=2400, chirp_share=0.69, patchy_db=5.0):
    """Very many faint chirps and their echoes, blurred into twittering with patchy noise."""
    out = np.zeros(N)
    for when, pitch, glide, length, loud in rng.random((count, 5)):
        hz = 600 + 7400 * pitch
        chirp = whistle(.012 + .03 * length, hz, hz * (.98 + .04 * glide), .004, .4, 200)
        add(out, when * N / SR, amp(9 * loud) * chirp)
    chirps = unit(out + 0.5 * yard(out))
    flock = chirp_share * chirps + mottle(rng.standard_normal(N), patchy_db, size=(10, 3))
    return amp(follow(CHATTER_LEVEL)[0]) * colour(flock, CHATTER_SPECTRUM)


# still air of the yard: (frequency [Hz], relative level [dB])
AIR_SPECTRUM = [(30, -50.5), (90, -18.5), (160, 10.5), (300, 10), (500, 6.5), (800, 5.5), (1300, -1.5),
                (2300, -9), (5000, -39.5), (8000, -21.5), (12500, -31), (14000, -41), (20000, -68.5)]


def air(level_db=-62, swell_db=0.3, patchy_db=4.5):
    """Outdoor hush: coloured, finely mottled noise with a slight slow swell."""
    hush = colour(mottle(rng.standard_normal(N), patchy_db), AIR_SPECTRUM)
    return amp(level_db + swell_db * drift(0.49)) * hush


def scene(echo_db=-14.0, echo_edge_hz=10000):
    """The close feeder with its faint echo, over breeze and distant birds."""
    responses = tray_responses()
    feeder = clicks(responses) + scrapes(responses) + nibbling(responses)
    echo = signal.lfilter(*signal.butter(1, echo_edge_hz, fs=SR), yard(feeder))
    wind = breeze() + hums() + buffeting()
    background = far_birds() + chatter() + air()
    return (feeder + amp(echo_db) * echo + wind + background)[None]


def record(dry, ceiling=0.94):
    """Soft overload of the loudest peaks, then the band limit."""
    limited = ceiling * np.tanh(dry / ceiling)
    low_pass = signal.firwin(255, BAND_LIMIT_HZ, window=("kaiser", 9), fs=SR)
    return signal.oaconvolve(limited, low_pass[None], "same")


dry = scene()
out = record(dry)
waveform_to_disk(out)
```